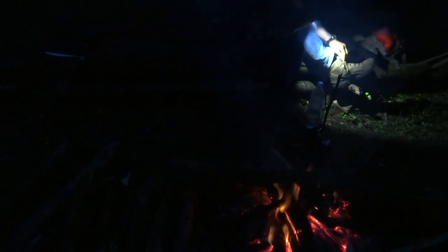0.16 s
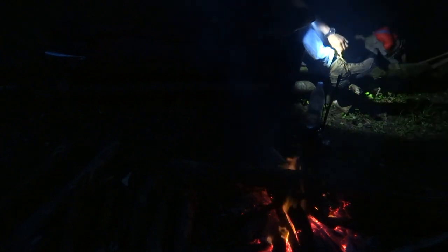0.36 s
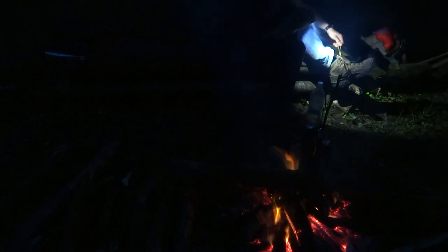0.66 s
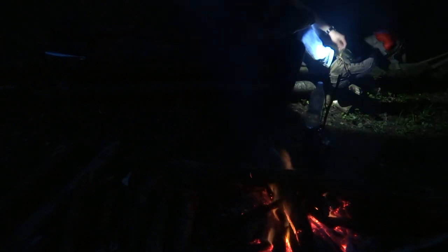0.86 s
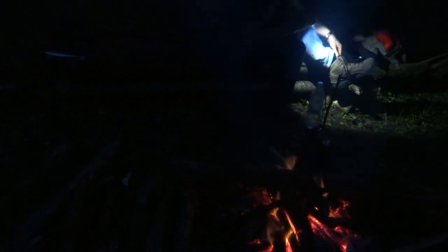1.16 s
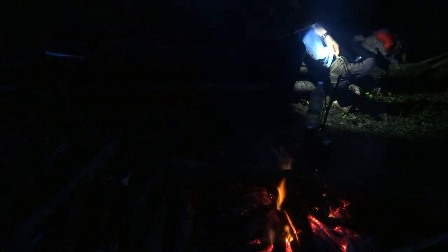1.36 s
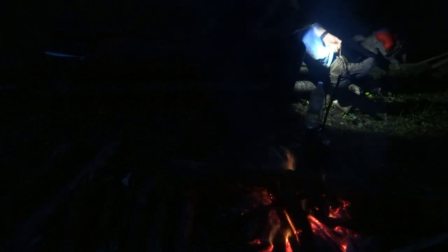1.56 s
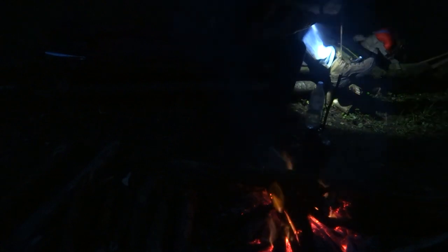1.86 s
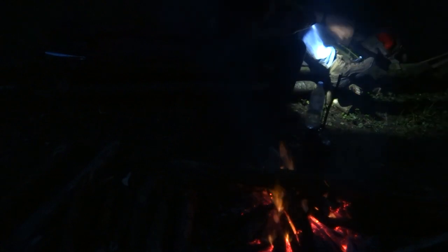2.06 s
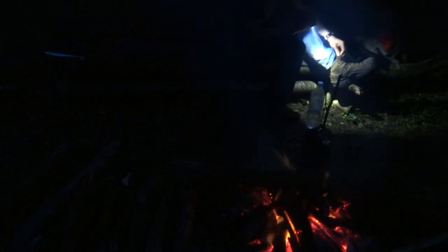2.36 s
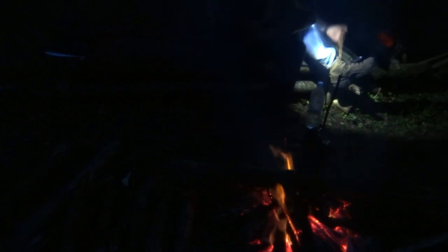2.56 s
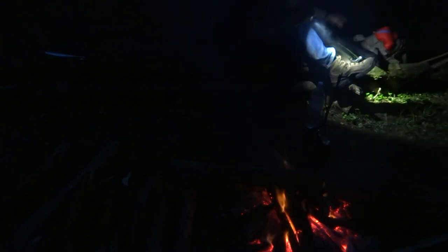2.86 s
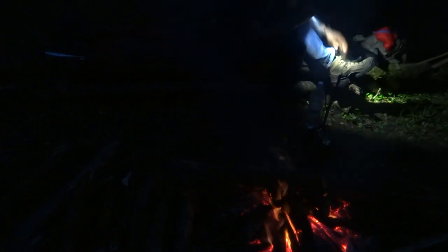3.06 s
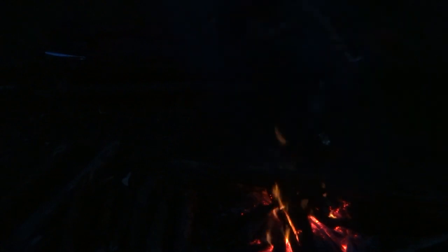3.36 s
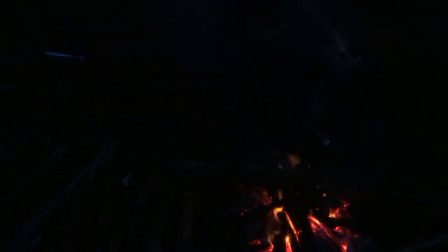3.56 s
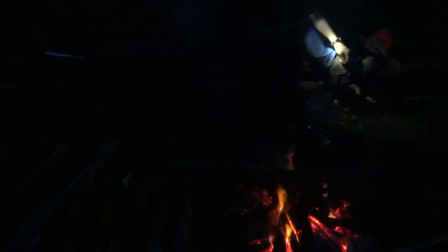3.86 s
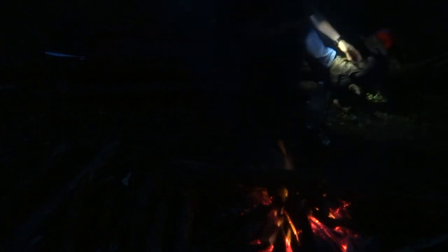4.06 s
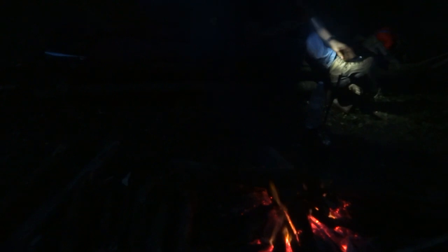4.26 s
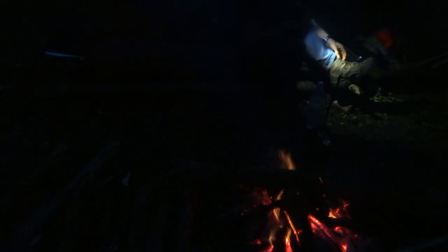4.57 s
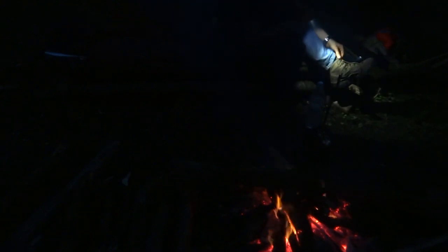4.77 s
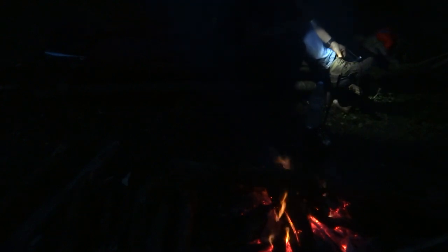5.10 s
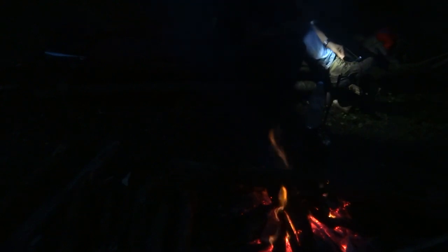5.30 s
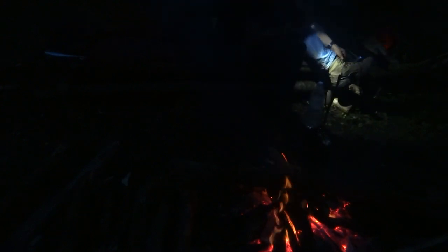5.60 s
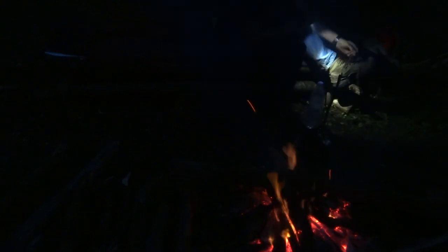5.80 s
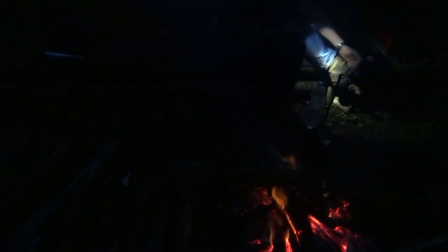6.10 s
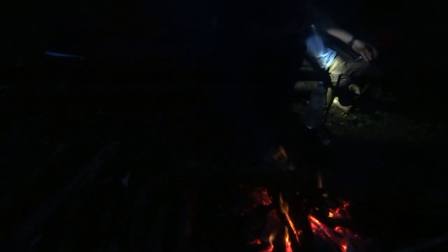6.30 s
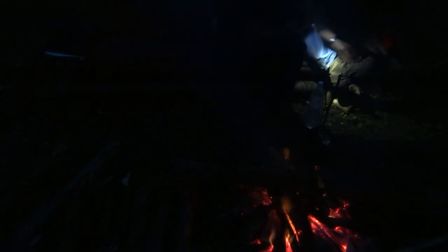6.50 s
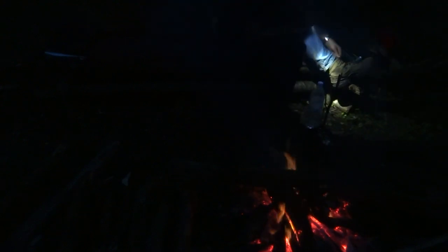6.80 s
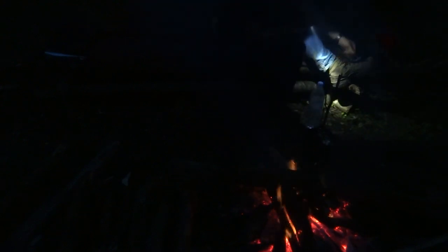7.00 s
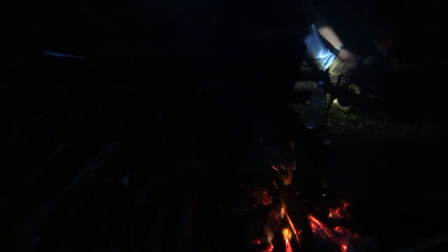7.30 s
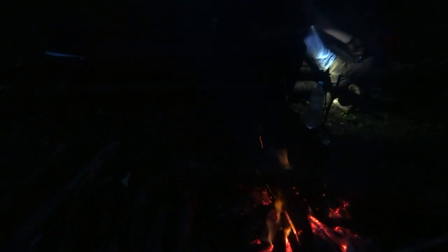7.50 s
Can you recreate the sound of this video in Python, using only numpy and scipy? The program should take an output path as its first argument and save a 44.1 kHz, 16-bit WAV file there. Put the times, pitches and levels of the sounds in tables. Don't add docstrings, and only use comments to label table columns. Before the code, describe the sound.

Night in a forest camp, with the microphone beside a low campfire. A soft airy hiss, sizzling sap and tiny ticks run throughout, over a faint, low generator throb of about 23 pulses a second. From 0 to 1.5 s, bright ember snaps click close by while distant birds whistle faintly among the trunks. At 1.6-2.0 s cloth rubs and gear knocks dully, then a sharp snap at 2.15 and another at 2.6. From about 3.1 to 5.1 s a nearer bird sings quick glides and short held whistles around 4 kHz, ringing through the trees; a thin high bird flutters twice, at 4.0 and 4.3, near another sharp snap and soft knocks. Far birds answer with whistles and buzzy trills from 5.2 to 6.9, with a snap at 5.95. At 7.06 a log bursts with the loudest pop, its scatter fading under several dull knocks.

```python
import sys
import numpy as np
from scipy import signal
from scipy.fft import rfft, irfft, next_fast_len
from scipy.io import wavfile
from scipy.ndimage import map_coordinates

SR = 44100
rng = np.random.default_rng(int(sys.argv[2]) if len(sys.argv) > 2 else 0)


def materialize(psi):
    bounded = np.clip(np.atleast_2d(psi).T, -1, 1)
    quanta = np.round(bounded * 32767).astype(np.int16)
    wavfile.write(sys.argv[1], SR, quanta)


def how_loud(loudness_db):
    steps = np.asarray(loudness_db, float) / 20
    return 10 ** steps


N = 337365


def unit(x):
    return x / np.sqrt(np.mean(x ** 2) + 1e-20)


def along(points, hz):
    f, v = np.transpose(points)
    return np.interp(np.log(hz + 1), np.log(f + 1), v)


def wobble(rate):
    knots = rng.standard_normal(int(N * rate / SR) + 4)
    return map_coordinates(knots, [np.arange(N) * rate / SR])


def filtered(x, response):
    m = next_fast_len(x.shape[-1] + 8192)
    spectrum = rfft(x, m) * response(np.fft.rfftfreq(m, 1 / SR))
    return irfft(spectrum, m)[..., :x.shape[-1]]


def resonance(f, hz, width):
    return 1j * f * width / (hz * hz - f * f + 1j * f * width + 1e-9)


def panned(x, pan_db):
    return x * how_loud(np.array([[pan_db / 2], [-pan_db / 2]]))


def rush(spectrum, alike):
    def shape(hz):
        turn = np.arccos(np.clip(along(alike, hz), -1, 1)) / 2
        return how_loud(along(spectrum, hz)) * [np.cos(turn), np.sin(turn)]

    mid, side = filtered(rng.standard_normal((2, N)), shape)
    return unit(np.array([mid + side, mid - side]))


def add(mix, x, s):
    start = max(round(s * SR), 0)
    mix[:, start:start + x.shape[1]] += x


def forest(x, spread_db, near_db, stretch):
    # (frequency [Hz], time to fall 60 dB [s])
    decay = [(500, 0.28), (3500, 1.0), (8500, 0.79), (11000, 0.33), (15000, 0.16)]
    tail_share = 0.5
    hz = np.linspace(0, SR / 2, 65)
    t = np.arange(round(stretch * tail_share * SR / 64)) * 64 / SR
    z = rng.standard_normal((2, len(hz), len(t), 2)) @ [1, 1j]
    late = how_loud(-60 * t / (stretch * along(decay, hz)[:, None]))
    early = how_loud(near_db - 60 * t / 0.096)
    mid, side = signal.istft(z * (late + early), SR, nperseg=128)[1]
    side = how_loud(spread_db) * side
    tail = np.array([mid + side, mid - side]) / np.linalg.norm(mid)
    return signal.oaconvolve(x[None], tail, axes=1)


def night():
    # (frequency [Hz], density [dB per Hz])
    air = [(12, -36), (20, 1.5), (98, 0.5), (344, -13.5), (965, -13.5), (1390, -25.5), (1550, -22),
           (1890, -22), (2290, -13.5), (2860, -26), (3890, -19), (6250, -28), (11900, -22.5),
           (13700, -26.5), (15600, -34), (15900, -55)]
    # (frequency [Hz], density [dB per Hz])
    sap = [(4000, -19), (7000, 5), (11500, 4), (14500, 5), (16000, -16)]
    # (frequency [Hz], likeness [0-1])
    alike = [(60, 1.0), (150, 0.96), (380, 0.3), (950, 0.079), (2380, 0.32), (5980, 0.93), (15000, 0.98)]
    swells_db = 1.8 * wobble(2.44) + 5.2 * wobble(35)
    sizzle = how_loud(-67.5 + swells_db) * rush(sap, alike)
    return how_loud(-52 + 0.38 * wobble(1.483)) * rush(air, alike) + sizzle


def generator():
    # (multiple of the firing rate, level [dB])
    exhaust = [(3, -64), (4, -56.5), (5, -62)]
    # (frequency [Hz], width [Hz], level [dB])
    panels = [(942, 182, 4), (2224, 570, -8)]
    firing_hz = 23.08
    turns = np.cumsum(firing_hz * (1 + 0.006 * wobble(1.5))) / SR
    tones = sum(how_loud(db + 1.6 * wobble(5)) * np.sin(2 * np.pi * k * turns + k) for k, db in exhaust)
    firings = np.diff(np.floor(turns), prepend=0)
    uneven = 1 + 0.25 * np.sin(np.pi * turns + 1.5)
    taps = firings * uneven * how_loud(2 * wobble(15))
    valve = unit(filtered(taps, lambda f: resonance(f, 1543, 83) ** 2))
    puff = 0.31 + np.exp(-3 * (turns % 1))
    casing = lambda f: sum(how_loud(db) * resonance(f, hz, w) ** 2 for hz, w, db in panels)
    mid, side = unit(filtered(puff * rng.standard_normal((2, N)), casing))
    clatter = mid + 0.44 * side * [[1], [-1]]
    return tones + how_loud(-70) * valve * [[0.9], [1.1]] + how_loud(-66.5) * clatter


def crackle():
    when, chance = rng.random((900, 2)).T
    size_db = np.minimum(-6 * np.log(1 - chance), 19)
    spikes = np.bincount((when * N).astype(int), how_loud(size_db), N)
    return how_loud(-49.5) * filtered(spikes, lambda f: resonance(f, 8000, 8600) ** 2)


def rustle():
    # (time [s], level [dB])
    rub = [
        (1.55, -100),
        (1.64, -55),
        (1.75, -50.5),
        (1.84, -52),
        (1.9, -61),
        (2.0, -71),
    ]
    # (frequency [Hz], density [dB per Hz])
    cloth = [(250, -39), (550, 0), (900, 0), (1300, -20), (3000, -5), (5600, -19), (9000, -15),
             (13000, -8.5), (15500, -23)]
    swell = how_loud(np.interp(np.arange(N) / SR, *np.transpose(rub)))
    return swell * how_loud(1.7 * wobble(70)) * rush(cloth, [(500, 0.86), (8000, 0.98)])


def knocks():
    # (time [s], peak level [dB], centre [Hz], left over right [dB])
    contacts = [(1.101, -40.5, 715, -.5), (1.822, -33.5, 686, -3), (1.834, -30, 620, -1),
                (1.852, -36, 780, 2), (2.39, -43.5, 960, -2), (3.976, -36, 880, -1), (4.047, -36, 1774, -3),
                (4.049, -46.5, 300, -1), (2.66, -43, 680, 0), (7.064, -33.5, 620, 1),
                (5.43, -45.5, 850, -3), (5.589, -34, 766, -1), (6.858, -43.5, 865, 0),
                (7.197, -34, 670, -1), (7.317, -31, 640, -2), (7.362, -40.5, 680, 1)]
    mix = np.zeros((2, N + 2 * SR))
    t = np.arange(SR // 8) / SR
    for s, db, hz, pan_db in contacts:
        thud_db = -12.5 - 18 * max(np.log2(hz / 950), 0)
        blow = 6 * (t == 0) + rng.standard_normal(len(t)) * how_loud(-60 * t / 0.042)
        ring = lambda f: resonance(f, hz, 0.82 * hz) ** 2
        thud = lambda f: how_loud(thud_db + 10.5) * resonance(f, 212, 210) ** 2
        knock = filtered(blow, lambda f: ring(f) - thud(f))
        knock *= how_loud(db - 0.65) / np.abs(knock).max()
        add(mix, panned(knock, pan_db), s + 0.00102)
    return mix[:, :N]


def embers():
    # (time [s], peak level [dB], centre [Hz], relative 2-3 kHz body [dB], left over right [dB])
    snaps = [(.024, -31, 9900, -17.5, -.5), (0.158, -33, 9900, -33, 1), (0.4247, -33, 11100, -27, -3),
             (1.1609, -36, 6500, -40, -3), (1.2889, -27, 11000, -25, -1.5), (1.6566, -26, 12200, -35, 0),
             (2.1556, -17.5, 11700, -18, -2), (2.61, -22, 10600, -36, 1), (2.6908, -35, 8450, -10, -2),
             (3, -35.5, 7960, -35, 3), (3.218, -29.5, 9900, -29, 3), (3.3687, -35, 8020, -29, -3),
             (3.7622, -35, 11500, -15, -2), (3.87, -29, 12200, -37, -3), (3.975, -33, 11000, -25, 1.5),
             (4.329, -20, 13000, -52, 1.5), (5.945, -20.5, 12900, -32, -2), (7.317, -39.5, 9350, -11, 6),
             (7.3933, -34.5, 9800, -18, 6), (7.5058, -38, 8000, -42, 4)]
    # (time [s], peak level [dB], centre [Hz])
    ticks = [(0.433, -39, 7840), (1.072, -37, 12000), (1.1004, -41, 7890), (2.955, -44.5, 12000),
             (1.2757, -38, 7820), (1.8497, -48, 11500), (2.3838, -50, 4000), (2.8, -39, 12500),
             (3.6094, -41, 9000), (4.1322, -36, 7000), (3.275, -41, 12000), (4.2514, -41, 7700),
             (4.5234, -42.5, 3520), (4.5396, -42, 2980), (5.0942, -32, 11500), (5.402, -35, 10700),
             (5.9244, -41, 12100), (6.5264, -40, 10800), (6.9744, -44, 11400), (7.38, -50, 12600),
             (7.528, -40, 9000)]
    tick_body_db, tick_pan_db = -23, -2
    mix = np.zeros((2, N + 2 * SR))
    t = np.arange(400) / SR
    air = lambda f: resonance(f, 7500, 27000) ** 2
    for s, db, hz, body_db, pan_db in snaps + [(*row, tick_body_db, tick_pan_db) for row in ticks]:
        burst = (t == 0) + 0.15 * rng.standard_normal(len(t)) * how_loud(-60 * t / 0.002)
        bright = lambda f: resonance(f, hz, 0.91 * hz) ** 2
        body = lambda f: how_loud(body_db + 23) * resonance(f, 2850, 3500) ** 2
        click = filtered(filtered(burst, lambda f: bright(f) - body(f)), air)
        click *= how_loud(db + 5.7) / np.abs(click).max()
        add(mix, panned(click, pan_db), s + 0.00064)
        add(mix, panned(how_loud(-15) * click, pan_db), s + 0.0053)
        add(mix, how_loud(-22) * forest(click, -15, 3.9, 0.58), s + 0.0059)
    return mix[:, :N]


def pop():
    # (time [s], peak level [dB])
    split = (7.063, -7.5)
    # (frequency [Hz], width [Hz], level [dB])
    log = [(218, 280, -2), (960, 410, -1.5), (3300, 1500, 1), (6100, 1700, 0), (10300, 5100, -4)]
    mix = np.zeros((2, N + 2 * SR))
    s, db = split
    t = np.arange(1500) / SR
    wood = lambda f: sum((-1) ** k * how_loud(g) * resonance(f, hz, w) for k, (hz, w, g) in enumerate(log))
    blow = filtered(1.0 * (t == 0), wood)
    scale = how_loud(db) / np.abs(blow).max()
    # delay [s], blow [dB], splinters [dB]
    for delay, blow_db, splinter_db in [(0, 2.5, -13), (0.006, -40, -20), (0.0107, -24, -43)]:
        splinters = filtered(rng.standard_normal(len(t)) * how_loud(-60 * t / 0.0096), wood)
        crack = how_loud(blow_db) * blow + how_loud(splinter_db) * splinters
        add(mix, panned(scale * crack, -1.5), s + delay)
    add(mix, scale * how_loud(-7) * forest(blow, -13, 2, 1), s + 0.004)
    return mix[:, :N]


def bird(notes, pan_db, direct_db, overtone_db, spread_db, near_db, stretch, warble, warble_hz, ease, second=1):
    mix = np.zeros((2, N + 2 * SR))
    unsteady, flutter = wobble(320), wobble(200)
    for s, length, first, last, db in notes:
        n = np.arange(round(length * SR))
        now = n + round(s * SR)
        u = n / len(n)
        pitch = last + (first - last) * (1 - u) ** ease
        pitch *= 1 + warble * (np.sin(2 * np.pi * warble_hz * n / SR) + unsteady[now])
        phase = 2 * np.pi * np.cumsum(pitch) / SR
        swell = np.sin(np.pi * u ** 0.66) ** 0.5
        breath = how_loud(1.6 * flutter[now])
        third = 0.75 * np.sin(3 * phase) * (3 * pitch < SR / 2)
        overtones = how_loud(overtone_db) * (second * np.sin(2 * phase) + third)
        note = how_loud(db) * swell * breath * (np.sin(phase) + overtones)
        add(mix, panned(how_loud(direct_db) * note, pan_db), s)
        add(mix, panned(forest(note, spread_db, near_db, stretch), pan_db), s)
    return mix[:, :N]


def far_birds():
    # (time [s], length [s], start [Hz], end [Hz], level [dB])
    whistles = [(0, 0.029, 3360, 3620, -54.5), (.23, 0.059, 4440, 4360, -63),
                (.265, 0.027, 2760, 3200, -56), (.275, 0.091, 3660, 3930, -51.5),
                (.31, .06, 3287, 3577, -44.5), (.46, 0.063, 3785, 4605, -45), (.48, .16, 3970, 4260, -47.5),
                (.47, 0.073, 3680, 3600, -52), (.625, 0.066, 2684, 2666, -44), (.585, .02, 2740, 2740, -55),
                (.72, 0.15, 2900, 3300, -52.5), (1.04, 0.22, 7920, 7640, -50.5),
                (1.403, 0.032, 3810, 3630, -43.5), (1.428, 0.033, 4100, 3630, -47),
                (1.468, .03, 3840, 3620, -48.5), (1.503, .045, 3950, 3630, -52),
                (1.56, 0.039, 3680, 3630, -55), (1.73, .06, 3020, 2983, -58.5),
                (2.265, 0.025, 3800, 3876, -56), (5.24, 0.055, 7220, 7100, -50.5),
                (5.265, 0.025, 6800, 4800, -49), (5.42, 0.047, 4800, 4670, -38.5),
                (5.62, 0.062, 3663, 3527, -39.5), (6.318, 0.017, 2650, 3500, -44),
                (6.335, 0.036, 3350, 3480, -44), (6.375, 0.12, 3475, 3492, -39.5),
                (6.455, 0.059, 2680, 2433, -46), (6.53, 0.11, 2500, 2667, -50.5),
                (6.768, 0.031, 3250, 4450, -40), (6.755, 0.061, 3300, 3386, -46),
                (7.59, .055, 7230, 7160, -54)]
    return bird(whistles, pan_db=-3, direct_db=-10, overtone_db=-43, spread_db=-13, near_db=1,
                stretch=1.37, warble=0.006, warble_hz=69.2, ease=1.5)


def trills():
    # (time [s], length [s], start [Hz], end [Hz], level [dB])
    buzzes = [(1.45, 0.12, 3080, 2620, -53), (1.61, 0.074, 3370, 2855, -51.5),
              (1.72, 0.06, 4900, 3500, -58), (4.935, 0.054, 5310, 4830, -44.5),
              (6.445, 0.14, 2506, 2634, -52), (4.62, 0.036, 3500, 2750, -41),
              (4.655, 0.039, 2900, 2160, -52), (4.79, 0.02, 5960, 5600, -52.5),
              (5.335, 0.038, 6650, 6100, -45), (5.36, 0.037, 5520, 5020, -44.5),
              (5.43, 0.053, 5030, 4970, -49), (5.525, 0.065, 3800, 3500, -40.5),
              (5.78, 0.096, 3540, 3520, -55.5), (5.97, .025, 5630, 7220, -50), (6.0, 0.11, 6620, 6760, -48),
              (6.03, 0.093, 7250, 7350, -52), (5.99, .05, 6100, 6330, -56),
              (6.81, 0.091, 4400, 4050, -40.5), (6.86, 0.095, 4950, 4680, -59),
              (4.922, .03, 4800, 5950, -48), (4.92, .07, 7600, 6500, -52), (4.06, .2, 3050, 3100, -59),
              (4.12, .2, 3750, 3450, -57)]
    return bird(buzzes, pan_db=-3, direct_db=-10, overtone_db=-45, spread_db=-13.5, near_db=-4.5,
                stretch=1.24, warble=0.027, warble_hz=63.8, ease=1.206)


def high_bird():
    # (time after its start [s], length [s], start [Hz], end [Hz], relative level [dB])
    call = [
        (0, .012, 7500, 8650, -13),
        (0.012, 0.017, 8600, 6280, -1.5),
        (0.02, 0.016, 6560, 6590, -0.5),
        (0.053, 0.025, 8360, 8410, -1.5),
        (.06, .035, 7750, 7700, -4.5),
        (.101, .03, 8380, 7020, -9),
        (0.125, 0.022, 8780, 8600, -16),
    ]
    # (time [s], pitch factor, level [dB])
    calls = [
        (3.975, 1, -31),
        (4.321, 1.015, -30),
    ]
    # (time [s], length [s], start [Hz], end [Hz], level [dB])
    thin = [
        (2.965, 0.025, 7100, 8560, -51),
        (2.99, 0.021, 7880, 7740, -45),
        (3.02, 0.026, 7930, 6350, -47.5),
    ]
    sung = [(s + after, length, k * first, k * last, db + rel_db)
            for s, k, db in calls for after, length, first, last, rel_db in call]
    return bird(thin + sung, pan_db=1.3, direct_db=-6, overtone_db=-17, spread_db=-15, near_db=2.5,
                stretch=0.89, warble=0.015, warble_hz=102.5, ease=1.4)


def near_whistles():
    # (time [s], length [s], start [Hz], end [Hz], level [dB])
    whistles = [(3.7, 0.015, 3816, 3834, -30), (3.735, 0.13, 3833, 3876, -34),
                (3.915, 0.067, 3980, 4800, -48.5), (4.01, 0.14, 4170, 4267, -48),
                (5.045, 0.018, 4170, 4210, -32.5), (5.07, 0.088, 4260, 4190, -35),
                (5.047, 0.026, 3644, 3580, -37), (5.1, 0.043, 3600, 3650, -36),
                (3.06, 0.227, 7950, 7950, -57.5), (3.37, 0.086, 8020, 7880, -51),
                (3.5, 0.18, 7970, 8030, -61)]
    return bird(whistles, pan_db=2, direct_db=-3.5, overtone_db=-36, spread_db=-12.5, near_db=11,
                stretch=1.05, warble=0.006, warble_hz=78.8, ease=1.32)


def near_song():
    # (time [s], length [s], start [Hz], end [Hz], level [dB])
    glides = [(2.69, 0.0089, 4250, 3730, -46), (2.7, 0.022, 3786, 3660, -43),
              (3.16, 0.039, 6515, 6840, -41), (3.183, 0.011, 6560, 4570, -39),
              (3.319, .016, 4250, 4550, -28), (3.36, .02, 4440, 4780, -32.5), (3.45, .011, 3160, 4350, -41),
              (3.46, 0.011, 4260, 4800, -27.5), (3.463, 0.01, 4700, 5600, -35.5),
              (3.486, 0.02, 3720, 3696, -28), (3.507, 0.041, 3650, 3814, -23),
              (3.48, 0.0081, 3000, 3800, -39.5), (3.55, 0.054, 3780, 3500, -32.5),
              (3.568, 0.044, 2783, 3160, -41), (3.613, 0.012, 3400, 3860, -30.5),
              (3.695, 0.091, 3186, 3425, -38), (4.582, .007, 4670, 3630, -34.5),
              (4.6, 0.013, 4180, 3650, -31), (4.602, .018, 4250, 4450, -38), (4.622, .03, 4400, 4050, -32),
              (4.626, 0.036, 3760, 3550, -34), (4.755, .011, 3230, 4020, -40),
              (4.764, 0.011, 3900, 4680, -24), (4.775, 0.021, 4686, 3446, -22.5),
              (4.8, 0.027, 4610, 4150, -32.5), (4.917, 0.015, 4090, 4550, -26),
              (4.953, 0.025, 4373, 4208, -23.5), (4.792, .036, 3400, 2110, -47),
              (4.936, .024, 4100, 3100, -43), (4.958, 0.032, 3100, 2430, -44.5)]
    # (time [s], length [s], pitch [Hz], level [dB])
    held = [(2.716, 0.016, 4200, -49), (3.19, 0.11, 4950, -50.5), (3.198, 0.017, 4470, -38),
            (3.33, 0.036, 4420, -25.5), (3.469, 0.032, 5720, -40.5), (3.539, 0.01, 4180, -29),
            (3.622, 0.026, 3840, -22.5), (3.64, 0.015, 4203, -35), (4.588, 0.017, 3850, -25.5),
            (4.61, 0.011, 3690, -24), (4.623, .008, 5200, -53)]
    notes = glides + [(s, length, hz, hz, db) for s, length, hz, db in held]
    return bird(notes, pan_db=1.5, direct_db=-2.5, overtone_db=-29.5, spread_db=-13.5, near_db=13,
                stretch=1.19, warble=0.01, warble_hz=90.5, ease=1.3, second=0.71)


def scene():
    camp = night() + generator() + crackle() + rustle() + knocks() + embers() + pop()
    birds = far_birds() + trills() + high_bird() + near_whistles() + near_song()
    return camp + birds


def roll_off(x):
    return signal.sosfilt(signal.butter(12, 16990, fs=SR, output="sos"), x)


def record(dry):
    # (frequency [Hz], gain [dB])
    microphone = [(15, -16), (32, -8), (45, 0), (13500, 0), (15700, -7), (16100, -24), (17000, -50)]
    mix = filtered(dry, lambda f: how_loud(along(microphone, f)))
    return roll_off(mix)


dry = scene()
out = record(dry)
materialize(out)
```